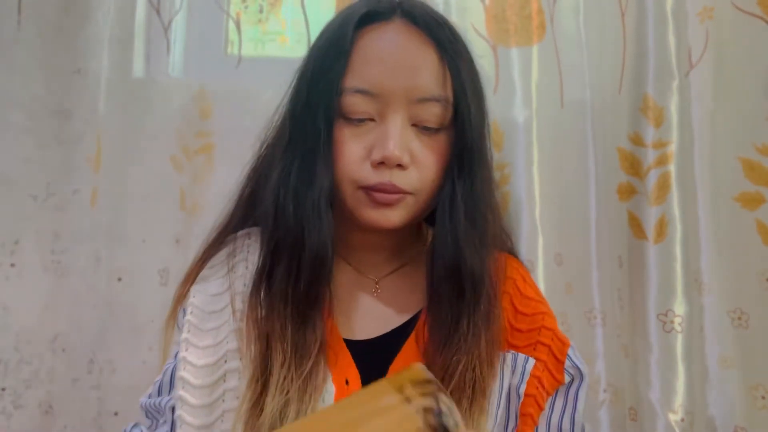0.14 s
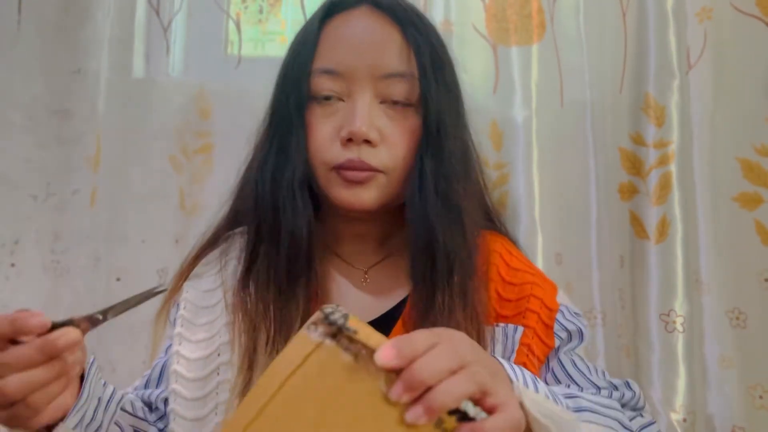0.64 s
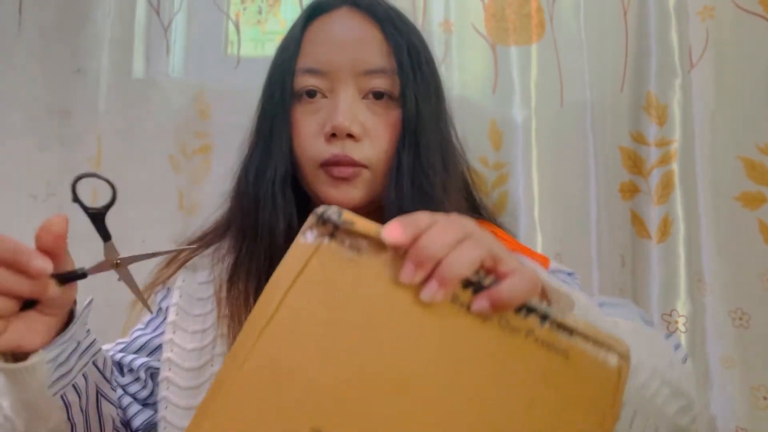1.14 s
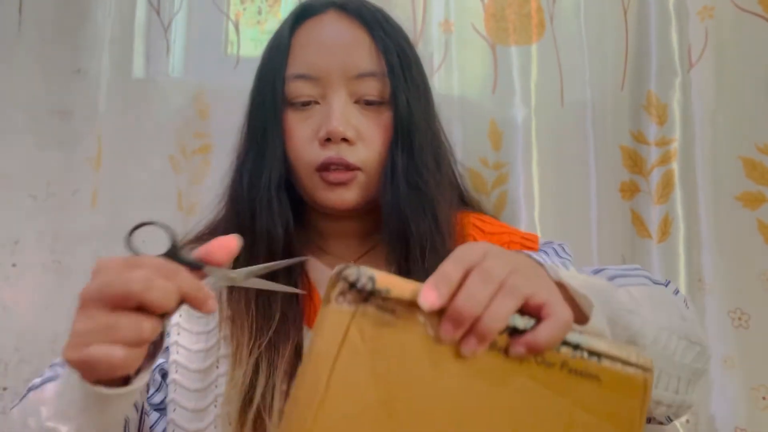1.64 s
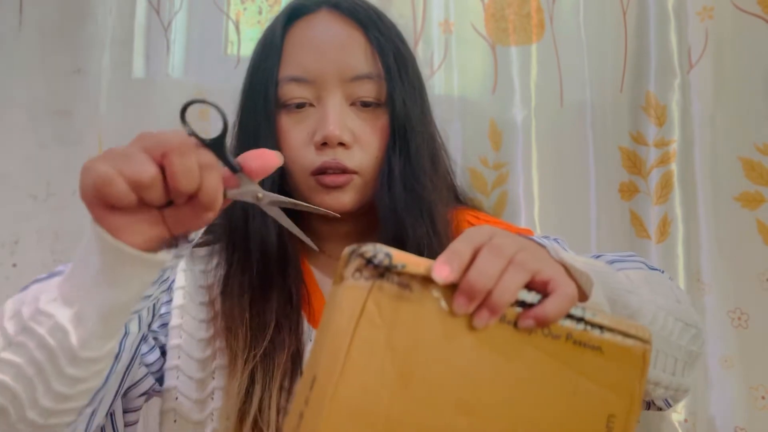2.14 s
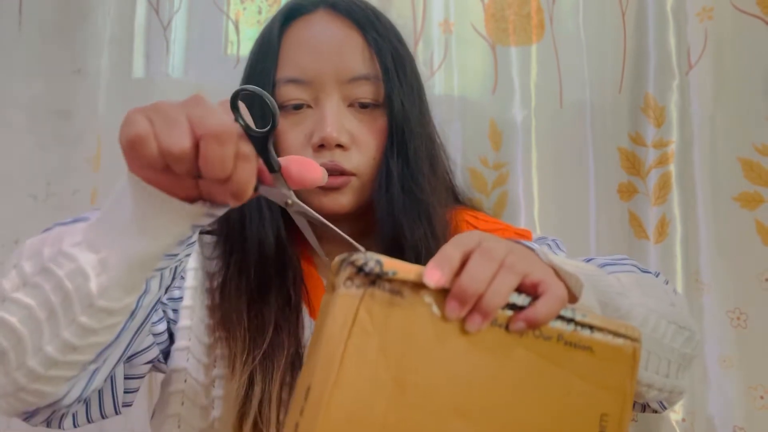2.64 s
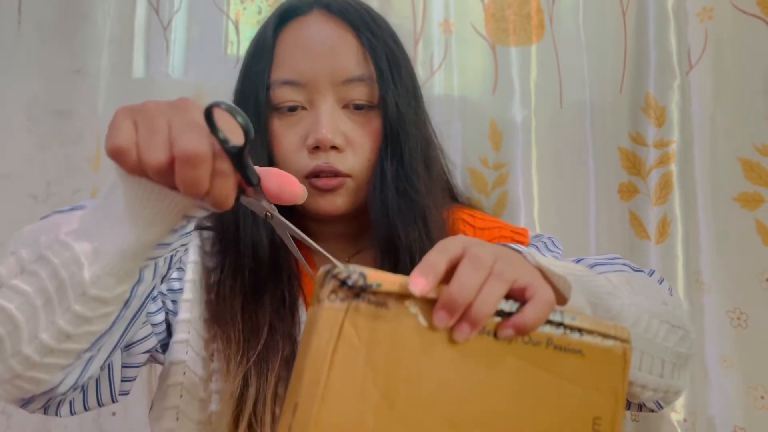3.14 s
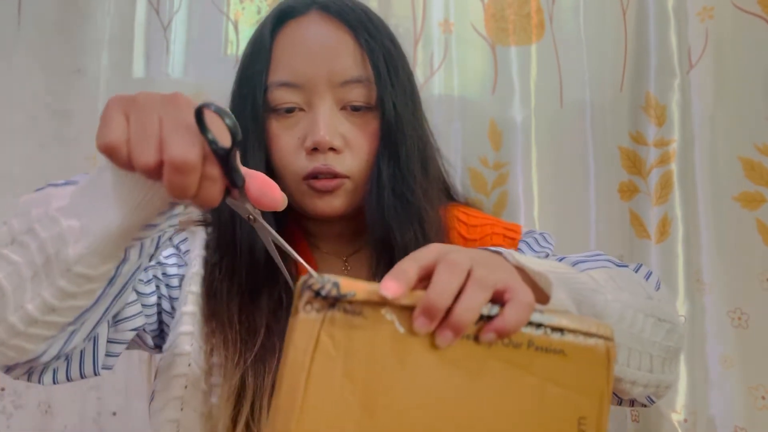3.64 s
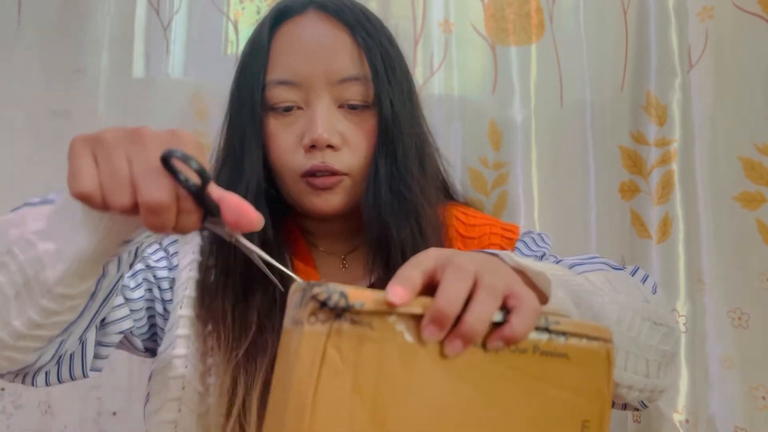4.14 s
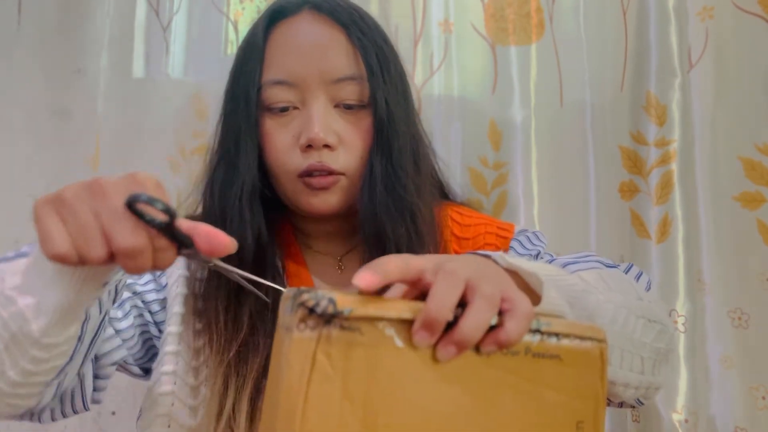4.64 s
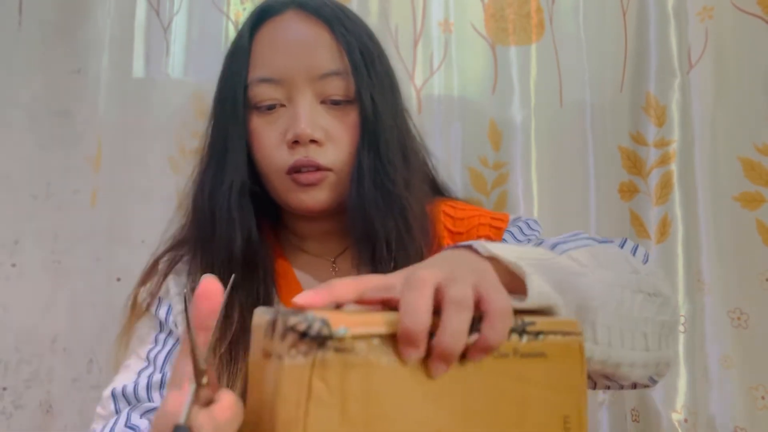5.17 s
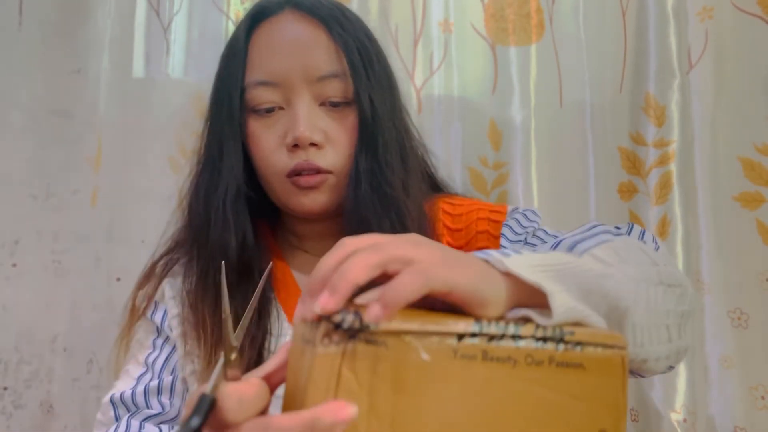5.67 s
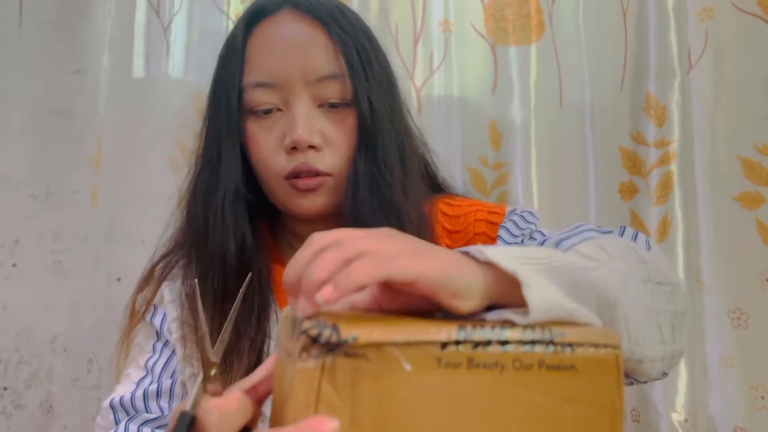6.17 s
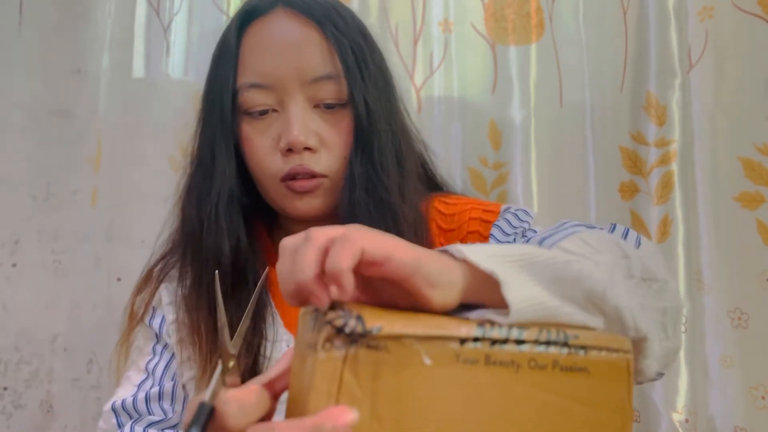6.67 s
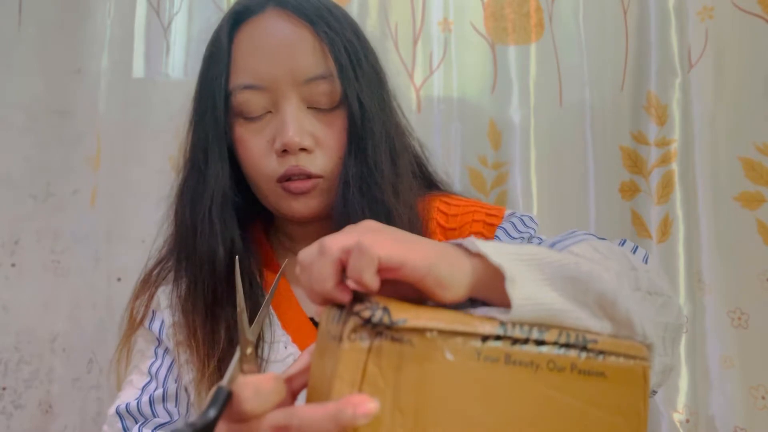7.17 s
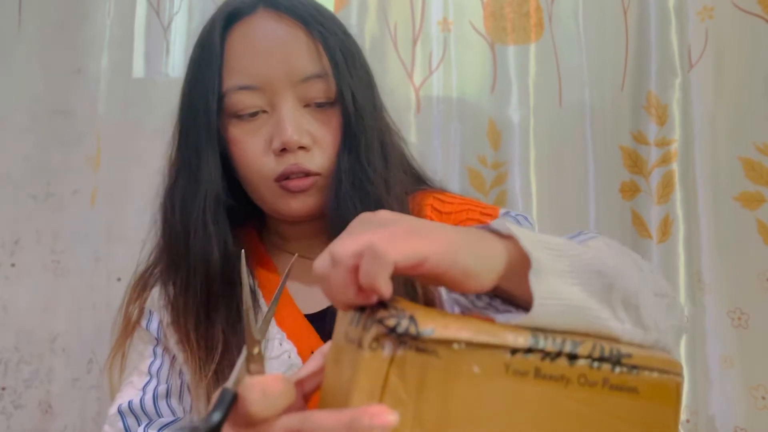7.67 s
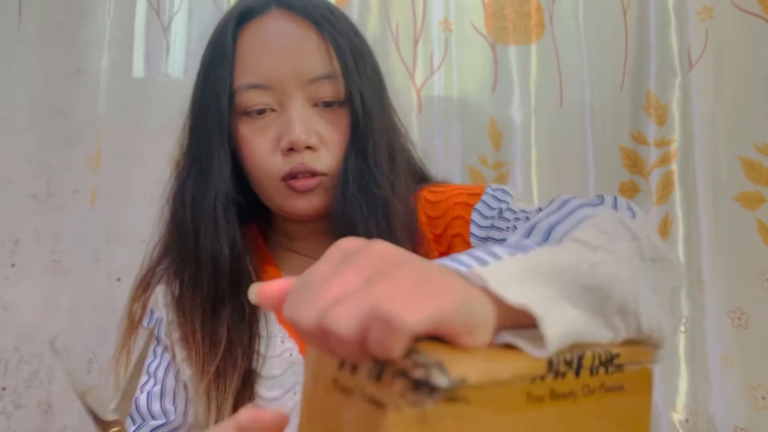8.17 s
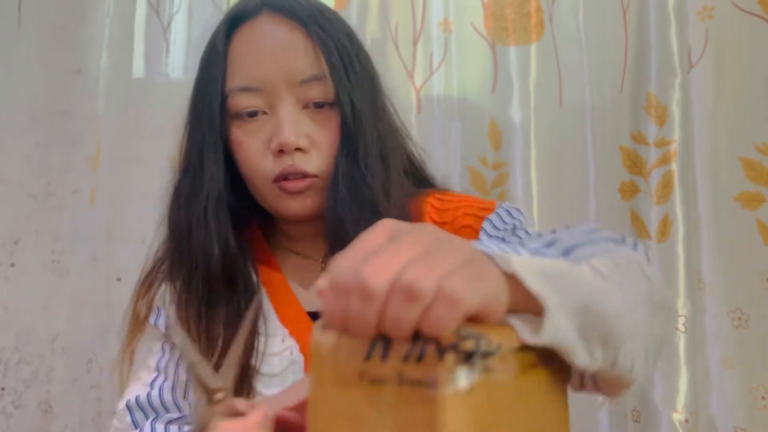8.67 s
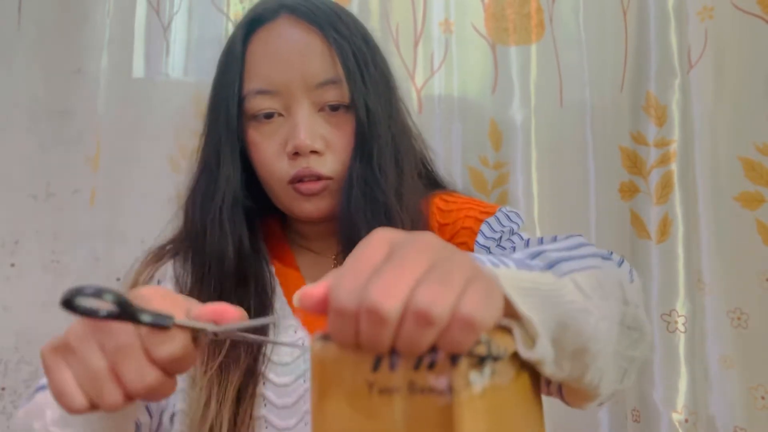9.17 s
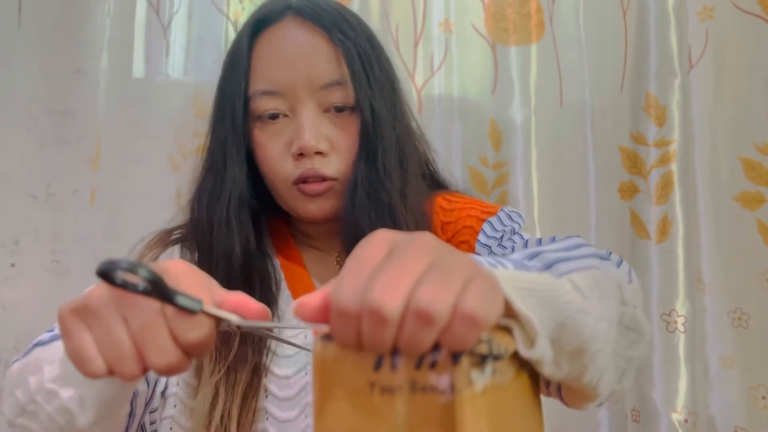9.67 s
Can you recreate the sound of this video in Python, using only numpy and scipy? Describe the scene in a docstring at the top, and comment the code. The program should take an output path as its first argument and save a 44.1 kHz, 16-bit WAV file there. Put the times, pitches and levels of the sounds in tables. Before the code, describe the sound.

Hands work at a taped parcel: light rubs, sharp ticks, cracking board and boxy thuds in irregular clusters, over a very quiet room hush.

```python
"""A quiet soft room, where hands turn, cut and pull open a taped cardboard parcel an arm's length from a phone.
Stick-slip of skin and blade shakes the board's resonances and crackles in tape; short noise bursts
crack and tick, single flutes pop at their own pitch, and knocks ring the modes of the hollow box.
The table rumbles in low resonances; a decaying diffuse echo and shaped noise make up the room.
Narrow-band insects and a two-reed horn with a blurred high overtone sound faintly outdoors."""
import sys
import numpy as np
from scipy import signal
from scipy.fft import rfft, irfft, next_fast_len
from scipy.io import wavfile
from scipy.ndimage import uniform_filter1d, map_coordinates

SR = 44100
rng = np.random.default_rng(int(sys.argv[2]) if len(sys.argv) > 2 else 0)


def generate_wav(sig):
    """Save sig (samples, or channels by samples) to the path in sys.argv[1] as 16-bit PCM at SR."""
    pcm = np.round(np.clip(np.atleast_2d(sig).T, -1, 1) * 32767).astype(np.int16)
    wavfile.write(sys.argv[1], SR, pcm)


def decibels_to_gain(level_db):
    """Convert a level in decibels to a linear amplitude gain (20 dB per decade)."""
    exponent = np.asarray(level_db, float) / 20
    return 10 ** exponent


N = 432621  # samples in the scene
AFTER = np.arange(int(.2 * SR)) / SR  # seconds since the onset of a short sound


def colour(x, points):
    """Minimum-phase filtering: a causal response is built from the log gain through (Hz, dB) points."""
    hz, db = np.transpose(points)
    f = np.linspace(1, SR / 2, 2049)
    log_gain = np.interp(np.log(f), np.log(hz), db) * np.log(10) / 20
    cepstrum = irfft(log_gain)
    # folding the cepstrum onto positive time makes the filter causal
    cepstrum[1:2048] *= 2
    cepstrum[2049:] = 0
    response = irfft(np.exp(rfft(cepstrum)))
    return signal.fftconvolve(x, np.atleast_2d(response), axes=-1)[..., :x.shape[-1]]


def ring(x, hz, width_hz):
    """Simple resonance: one damped mode with gain 1 at its centre."""
    return signal.lfilter(*signal.iirpeak(hz, hz / width_hz, fs=SR), x)


def unit(x):
    """Normalisation by mean power: scales to rms 1."""
    return x / np.sqrt(np.mean(x ** 2))


def curve(rows):
    """Linear interpolation: the columns of a table, sample by sample."""
    s, *columns = np.transpose(rows)
    return [np.interp(np.arange(N) / SR, s, c) for c in columns]


def walk(rate):
    """Low-passed chance: held random values, smoothed twice, with spread near 1."""
    k = int(SR / rate)
    held = np.repeat(rng.standard_normal(N // k + 1), k)
    return 1.3 * uniform_filter1d(uniform_filter1d(held, k), k)[:N]


def slips(per_s, spread_db):
    """Stick-slip friction: random clicks of either sign, a few much larger than the rest."""
    chance, size, sign = rng.random((3, N))
    size_db = np.minimum(-spread_db * np.log(size + 1e-9), 12)
    return unit((chance < per_s / SR) * decibels_to_gain(size_db) * np.sign(sign - .5))


def bursts(rise_s, t60, count):
    """Fracture as an impulsive release: one exponentially fading noise burst for every crack."""
    t = AFTER[:SR // 20]
    fade = np.exp(-np.log(1000) * t / t60)
    return rng.standard_normal((count, len(t))) * np.minimum(t / rise_s, 1) * fade


def place(times, peak_db, sounds):
    """Superposition: each sound is scaled by its peak and added with that peak at its time."""
    out = np.zeros(N + len(AFTER))
    for s, db, sound in zip(times, peak_db, sounds):
        top = np.abs(sound).argmax()
        i = int(s * SR) - top
        out[i:i + len(sound)] += decibels_to_gain(db) * sound / abs(sound[top])
    return out[:N]


# How firmly the box is braced on the table, so that its big panels sound and its flutes snap.
# Each row: time in seconds, bracing in dB.
BRACING = [(0, -10), (1.7, -8), (3.8, -4.5), (7.9, 0), (8.8, -8.5)]
# Strokes of hand or blade over the board.
# Each row: start in seconds, length in seconds, board level in dB, tape and fibre level in dB.
STROKES = [(0.0, 0.19, -59.5, -68.5), (0.292, .12, -54.5, -72.5), (0.586, 0.12, -46, -69),
           (0.892, 0.084, -69, -67), (1.031, 0.032, -48, -62), (1.476, 0.044, -49.5, -62.5),
           (1.584, 0.02, -45.5, -60), (3.245, 0.029, -53.5, -64), (3.345, 0.048, -62.5, -56.5),
           (3.853, 0.077, -38, -45.5), (4.093, 0.054, -40, -47.5), (4.184, 0.0062, -36.5, -43.5),
           (4.337, 0.0019, -44, -52.5), (4.42, 0.08, -65, -68.5), (4.542, 0.011, -44.5, -47.5),
           (4.635, 0.0068, -41, -57), (4.723, 0.15, -61.5, -73), (5.058, 0.097, -55, -61.5),
           (5.192, 0.095, -55.5, -55.5), (5.307, 0.31, -63.5, -69.5), (5.683, 0.055, -62, -70.5),
           (5.76, 0.12, -60, -63.5), (5.871, 0.048, -55, -60), (5.963, 0.037, -50.5, -82),
           (6.199, 0.11, -59.5, -56), (6.4, 0.11, -66, -60), (6.506, 0.013, -45, -47),
           (6.548, 0.15, -64.5, -70), (6.705, 0.13, -58, -66), (7.024, 0.052, -61, -69),
           (7.116, 0.36, -70.5, -71.5), (7.209, 0.13, -63, -65), (7.51, 0.12, -67, -74),
           (7.815, 0.24, -65, -66.5), (8.002, 0.063, -48.5, -49.5), (8.108, 0.023, -42, -52.5),
           (8.173, 0.22, -58.5, -60), (8.391, 0.03, -48.5, -63), (8.487, 0.1, -57.5, -64.5),
           (8.69, 0.057, -62, -65), (8.771, 0.014, -45, -66.5)]


def strokes():
    """Envelopes that add in power: every stroke sets in, holds and dies away; returns board and tape dB."""
    braced_rise_db_per_s, fall_db_per_s = 3195.5, 372  # the rise is for bracing of 0 dB
    t = np.arange(0, N / SR + .01, .001)
    start, length, *levels = np.transpose(STROKES)[:, :, None]
    # a braced box answers the hand at once, a loose one lags
    rise = braced_rise_db_per_s * decibels_to_gain(2 * np.interp(start, *np.transpose(BRACING)))
    onset_db = -rise * np.maximum(start - t, 0)
    decay_db = -fall_db_per_s * np.maximum(t - start - length, 0)
    shape_db = onset_db + decay_db
    power = [np.sum(decibels_to_gain(2 * (db + shape_db)), axis=0) + 1e-12 for db in levels]
    return curve(np.transpose([t, *(10 * np.log10(p) for p in power)]))


# Resonances of the board panels.
# Each row: centre in Hz, width in Hz, mean level in dB.
BOARD_MODES = [(260, 550, -4), (402, 115, 3), (545, 215, -9.5), (987, 730, -9.5), (1470, 770, -12.5),
               (2520, 2400, -24.5)]
# Spectrum of brittle tape and fibres.
# Each row: frequency in Hz, gain in dB.
TAPE_SPECTRUM = [(1500, -35.5), (3000, 8), (5000, 5), (8000, 10.5), (12000, -0.5), (16000, 7)]


def scrape():
    """Friction-driven resonance: dense slips shake the panels, sparse ones snap, finer ones crackle in tape."""
    board_db, tape_db = strokes()
    rub = slips(2000, 1.4) * decibels_to_gain(2.82 * walk(90))
    brace = decibels_to_gain(curve(BRACING)[0])
    flute_snaps = brace * decibels_to_gain(-7.5) * slips(90, 2.8)
    shake = rub + flute_snaps
    panels = []
    for k, (hz, width_hz, db) in enumerate(BOARD_MODES):
        # the moving hand damps now one panel, now another
        gain = decibels_to_gain(db + 1.96 * walk(35))
        panels.append((-1) ** k * gain * ring(shake, hz, width_hz))
    # bracing brings out the two deepest panel resonances
    all_panels = brace * sum(panels[:2]) + sum(panels[2:])
    board = signal.lfilter(*signal.butter(1, 3500, fs=SR), all_panels)
    fizz = decibels_to_gain(1.5) * rub + decibels_to_gain(0.5) * slips(130, 3) + decibels_to_gain(-6.0) * rng.standard_normal(N)
    tape = colour(fizz[None], TAPE_SPECTRUM)[0]
    return decibels_to_gain(board_db) * unit(board) + decibels_to_gain(tape_db) * unit(tape)


def crack(s, peak_db):
    """Impulse response of broad resonances: a short crack of the board."""
    sound = bursts(0.00097, .012, count=len(s))
    for hz, width_hz in ((1000, 1400), (1200, 2000), (2000, 3400)):
        sound = ring(sound, hz, width_hz)
    return place(s, peak_db, sound)


def tick(s, peak_db):
    """High-passed impulse: a sharp thin tick; ticks come from all over, so part reaches both ports at once."""
    sound = colour(bursts(0.00033, 0.006, count=len(s)), TAPE_SPECTRUM)
    sound = signal.lfilter(*signal.butter(2, 3800, "high", fs=SR), sound)
    ahead_db = peak_db - 23.0 + 4 * rng.standard_normal((len(s), 2)).T
    return np.array([place(s, db, sound) for db in (peak_db, *ahead_db)])


# Clear cracks of the board.
# Each row: time in seconds, peak in dB.
CRACKS = [(0.929, -36.5), (2.449, -46.5), (2.847, -52), (3.095, -45.5), (3.267, -40.5), (3.349, -41),
          (3.862, -20.5), (3.927, -31.5), (4.189, -32), (4.221, -30.5), (4.344, -30.5), (4.643, -33),
          (4.754, -53), (4.791, -37.5), (5.087, -22.5), (5.147, -35), (5.179, -41), (5.564, -46.5),
          (5.683, -41.5), (5.764, -44.5), (5.882, -43), (5.911, -52), (5.979, -30.5), (6.293, -45),
          (6.506, -28.5), (6.514, -31.5), (6.617, -41.5), (6.709, -39.5), (6.819, -39), (6.899, -35.5),
          (7.016, -33.5), (7.222, -41), (7.529, -45), (8.002, -39.5), (8.023, -21), (8.098, -31),
          (8.103, -28), (8.387, -39), (8.415, -37.5), (8.426, -47), (8.737, -46), (9.099, -46)]
# Ticks of brittle tape letting go.
# Each row: time in seconds, peak in dB.
TICKS = [(0.133, -25.5), (0.379, -32.5), (0.576, -46), (0.733, -21), (0.886, -35), (0.913, -38),
         (0.928, -19), (1.03, -37.5), (1.358, -37), (2.448, -43.5), (3.265, -35.5), (3.349, -23.5),
         (3.38, -25.5), (3.484, -36), (3.862, -17), (3.925, -26), (4.188, -17.5), (4.222, -26),
         (4.341, -24), (4.495, -27.5), (4.516, -31), (4.561, -25.5), (4.642, -32), (4.791, -21.5),
         (4.942, -29.5), (5.138, -19), (5.147, -25.5), (5.204, -25.5), (5.233, -27.5), (5.269, -22.5),
         (5.566, -35), (5.689, -27.5), (5.965, -33), (5.98, -27.5), (6.009, -21), (6.206, -32),
         (6.231, -31), (6.426, -30.5), (6.489, -32), (6.514, -24.5), (6.528, -32), (6.588, -29.5),
         (6.653, -26.5), (6.899, -35), (7.016, -21), (7.219, -30), (7.302, -36), (7.528, -41), (8.013, -19),
         (8.022, -14.5), (8.321, -30), (8.331, -27.5), (8.387, -38.5), (8.484, -31.5), (8.505, -34),
         (9.099, -34.5), (9.788, -39)]


def cracks():
    """Random fracture under load: clear cracks and ticks, and small chance ones that follow the stroke."""
    small_crack_db, small_tick_db, scatter_db = 3.5, 16.5, 9  # mean peak over the stroke, scatter
    when = rng.integers(SR // 10, N - SR // 10, size=420)
    scatter = scatter_db * rng.standard_normal((len(when), 2)).T
    lift_db = 2 * curve(BRACING)[0][when] + scatter
    board_db, tape_db = strokes()
    small_cracks = crack(when / SR, board_db[when] + small_crack_db + lift_db[0])
    small_ticks = tick(when / SR, tape_db[when] + small_tick_db + lift_db[1])
    board = small_cracks + crack(*np.transpose(CRACKS))
    tape = small_ticks + tick(*np.transpose(TICKS))
    return board + tape[0], tape[1:]


# Knocks on the box.
# Each row: time in seconds, peak in dB, contact in milliseconds.
KNOCKS = [(0.03, -43.5, 1.17), (2.45, -45, 1.16), (2.853, -55.5, 0.81), (3.097, -44.5, 1.37),
          (3.27, -38.5, 1.36), (3.867, -25.5, 1.54), (3.984, -32, 2), (4.191, -20, 1), (4.226, -30, 1.2),
          (4.342, -24.5, 1.05), (4.553, -31, 1.12), (4.647, -31, 1.45), (4.691, -32, 1.3),
          (5.083, -15, 1.36), (5.982, -27, 0.7), (6.302, -43, 12), (6.507, -25.5, 1.16), (6.517, -24, 1.42),
          (6.711, -36, 1.45), (6.752, -40, 1.36), (6.9, -38.5, 1.33), (7.0171, -21, 1.45),
          (7.531, -30.5, 0.87), (8.005, -32, 1.08), (8.576, -39, 7.5), (9.567, -55.5, 1.35),
          (9.664, -53.5, .8)]
# Modes of the hollow box.
# Each row: frequency in Hz, 60 dB decay time in seconds, mean level in dB.
BOX_MODES = [(78, 0.073, 0), (139.5, 0.12, 6.5), (180.3, 0.31, 3.5), (236, 0.06, 4), (324, 0.036, 4),
             (391.7, 0.2, -1.5), (573, 0.026, 6.5), (738, 0.015, 1.5)]


def knocks():
    """Modal excitation: a push and rebound rings the hollow box; a longer contact favours the deep modes."""
    s, peak_db, contact_ms = np.transpose(KNOCKS)
    cycle = AFTER / (2 * contact_ms[:, None] / 1000)
    # the wall gives, springs back and settles within a couple of swings
    push = np.sin(2 * np.pi * cycle) * np.exp(-((cycle - 1.25) / 0.54) ** 2)
    # every spot on the box weights the modes a little differently
    spot = decibels_to_gain(2 * rng.standard_normal((len(KNOCKS), len(BOX_MODES))))
    box = 0
    for k, (hz, t60, db) in enumerate(BOX_MODES):
        width_hz = np.log(1000) / np.pi / t60
        box = box + decibels_to_gain(db) * spot[:, [k]] * ring(push, hz, width_hz)
    return place(s, peak_db, box)


# Single flutes of the board popping.
# Each row: time in seconds, peak in dB, pitch in Hz.
POPS = [(3.232, -49.5, 750), (5.27, -38.5, 2383), (5.328, -43.5, 1990), (5.386, -45, 800),
        (6.427, -45, 1970), (6.654, -39, 2200), (7.351, -51, 684), (8.16, -35, 1040), (8.555, -54, 920),
        (9.571, -59, 1750)]


def pops():
    """Free damped oscillation: a flute buckles and rings briefly at its own pitch."""
    cycles_to_60_db = 10.4
    s, peak_db, hz = np.transpose(POPS)
    cycle = AFTER * hz[:, None]
    envelope = np.minimum(cycle / 1.8, 1) * np.exp(-np.log(1000) * cycle / cycles_to_60_db)
    return place(s, peak_db, np.sin(2 * np.pi * cycle) * envelope)


# Arms and box rocking on the table.
# Each row: time in seconds, level in dB.
RUMBLE = [(0.0, -69), (1.72, -68), (2.65, -74), (2.76, -57.5), (3.11, -74), (3.39, -52), (3.79, -75.5),
          (3.88, -43), (4.07, -56), (4.21, -47), (4.43, -66), (5.14, -49), (5.27, -60), (5.68, -57),
          (6.17, -65.5), (6.28, -50.5), (6.75, -65), (6.83, -51), (7.16, -58.5), (7.57, -52.5), (7.98, -64),
          (8.06, -46), (8.3, -59), (8.55, -49.5), (9.34, -67.5), (9.67, -56), (9.81, -62.5)]


def rumble():
    """Noise-driven low modes: the wobble of box and table, in two resonances."""
    n = rng.standard_normal(N)
    deep = ring(ring(n, 56.3, 24.0), 84, 90)
    upper = ring(ring(n, 81.5, 26), 100.0, 150)
    return decibels_to_gain(curve(RUMBLE)[0]) * unit(deep + decibels_to_gain(-16) * upper)


# Phase between the two microphone ports.
# Each row: frequency in Hz, lag of the left port in radians.
PORT_LAG = [(300, 0.31), (1300, 1.05), (2600, 1.27), (4000, 4.4), (7000, 4.56), (9000, 3.75), (10300, 2.43),
            (12400, 3.34), (16000, 1.4)]


def ports(x):
    """Interaural-style phase difference: the sound reaches the right port first."""
    hz, lag = np.transpose(PORT_LAG)
    size = next_fast_len(N)
    turn = np.exp(.5j * np.interp(np.fft.rfftfreq(size, 1 / SR), hz, lag))
    spectrum = rfft(x, size)
    left, right = [irfft(spectrum * p, size)[:N] for p in (1 / turn, turn)]
    # the hands roam over the parcel, so the lead wanders by a sample or so
    roam = 0.28 * walk(6)
    at = np.arange(N)
    return np.array([map_coordinates(left, [at + roam], mode="mirror"),
                     map_coordinates(right, [at - roam], mode="mirror")])


def echo(x):
    """Diffuse reverberation: exponential noise tails, one for each port; curtains soak up the treble."""
    t60 = 0.36  # seconds
    t = np.arange(int(.4 * SR)) / SR
    fade = np.exp(-np.log(1000) * t / t60) * np.clip(t / 0.0015, 0, 1)
    tails = rng.standard_normal((2, len(t))) * fade
    damping = [(60, -0.5), (250, -0.5), (4000, -8.5), (9000, -14), (11000, -46.0)]  # Hz, dB
    dull = colour(x[None], damping)[0]
    return np.array([signal.fftconvolve(dull, h / np.sqrt(np.sum(h ** 2)))[:N] for h in tails])


# Soundings of the distant horn.
# Each row: start in seconds, end in seconds, level in dB.
HONKS = [(2.92, 3.55, -72.5), (3.62, 3.8, -73)]
# Reeds of the horn.
# Each row: frequency in Hz, mean level in dB.
REEDS = [(323, 0), (414.5, -8)]


def horn():
    """Propagation through moving air: two far-off reeds waver a little in level and phase on the way."""
    t = np.arange(N) / SR
    gate = sum(decibels_to_gain(db) * np.clip(np.minimum(t - a, b - t) / 0.022, 0, 1) for a, b, db in HONKS)
    reeds = 0
    for hz, db in REEDS:
        reeds = reeds + decibels_to_gain(db + 4 * walk(9)) * np.sin(2 * np.pi * hz * t + .5 * walk(9))
    return gate * reeds


def horn_overtone():
    """Noise-driven narrow resonance: a faint blurred high overtone of the distant horn, near 3.2 kHz."""
    t = np.arange(N) / SR
    n = rng.standard_normal(N)
    swell = np.exp(-((t - 3.05) / .08) ** 2)
    blur = ring(ring(n, 3100, 700), 3100, 900)
    return decibels_to_gain(-72) * swell * unit(ring(n, 3240, 40) + .6 * blur)


def insects():
    """Band-limited noise: a thin far-off band of chirring, wavering slowly in level."""
    chirr = ring(ring(rng.standard_normal(N), 5610, 500), 5780, 770)
    return decibels_to_gain(-85.5 + 1.0 * walk(3.4)) * unit(chirr)


# Spectrum of the room's hush.
# Each row: frequency in Hz, gain in dB.
ROOM_SPECTRUM = [(18, -39), (30, 11), (70, -9.5), (165, -13.5), (259, -3), (336, -9.5), (3980, -30),
                 (5590, -21), (9460, -44), (16000, -40.5)]


def room_tone():
    """Partial coherence: a steady hush, part shared by both ports and part independent."""
    hush = colour(rng.standard_normal((3, N)), ROOM_SPECTRUM)
    # the reference level is taken above 150 Hz
    above_bass = signal.sosfilt(signal.butter(2, 150, "high", fs=SR, output="sos"), hush[0])
    scale = decibels_to_gain(-73.5) / np.std(above_bass)
    return scale * (decibels_to_gain(-30) * ports(hush[0]) + decibels_to_gain(1.5) * hush[1:])


def scene():
    """Superposition of direct, reflected and ambient sound: the parcel close by, the rest around it."""
    snaps, ahead = cracks()
    parcel = scrape() + knocks() + snaps + pops()
    # the horn's overtone shares the port lag, bounce and echo of the parcel
    direct = parcel + horn_overtone()
    # the table top throws the upper mids back a moment later, square on to both ports
    bounce = decibels_to_gain(-7.5) * np.roll(ring(direct, 3880, 1100), SR // 600)
    chirring = np.array([insects(), insects()])
    far = chirring + horn() * np.array([[1.2], [.8]])
    # a second rumble moves the two ports in opposite senses
    sway = rumble() + decibels_to_gain(-11.5) * rumble() * np.array([[1], [-1]])
    return ports(direct) + ahead + bounce + decibels_to_gain(-4.0) * echo(direct) + sway + far + room_tone()


def roll_off(x):
    """The treble ends steeply here."""
    return signal.sosfilt(signal.butter(12, 16970, fs=SR, output="sos"), x)


def record(dry):
    """Band limiting: the phone cuts the deepest bass and the top."""
    x = signal.sosfilt(signal.butter(4, 40, "high", fs=SR, output="sos"), dry)
    x = signal.sosfilt(signal.ellip(8, .5, 60, 16100, fs=SR, output="sos"), x)
    return roll_off(x)


dry = scene()
out = record(dry)
generate_wav(out)
```